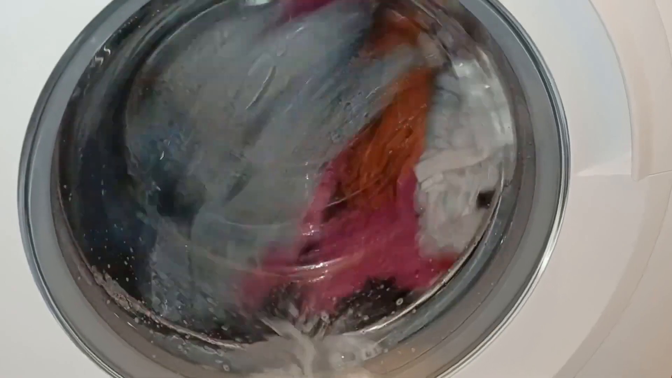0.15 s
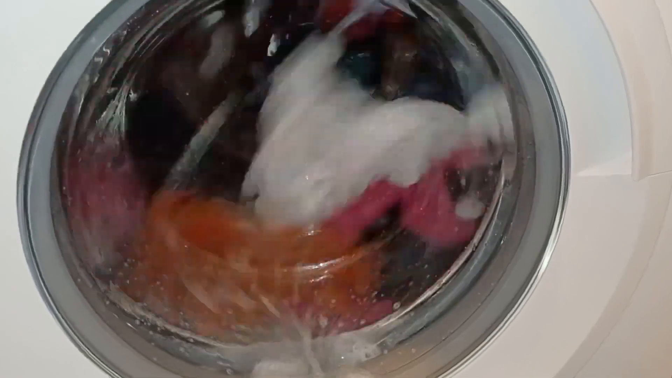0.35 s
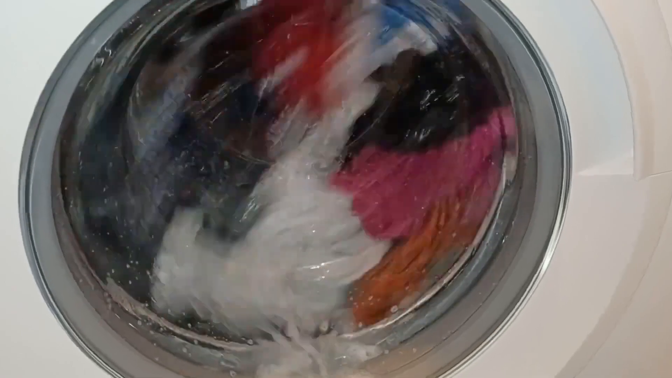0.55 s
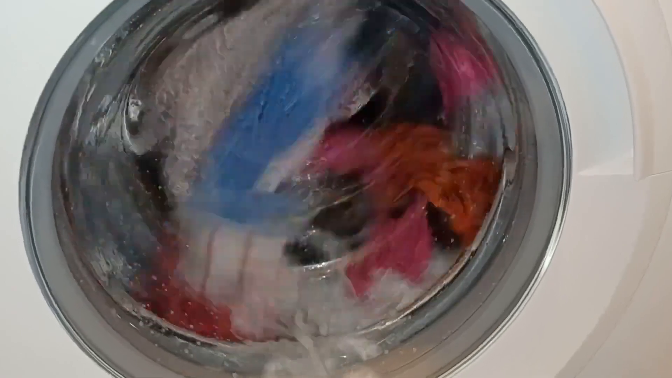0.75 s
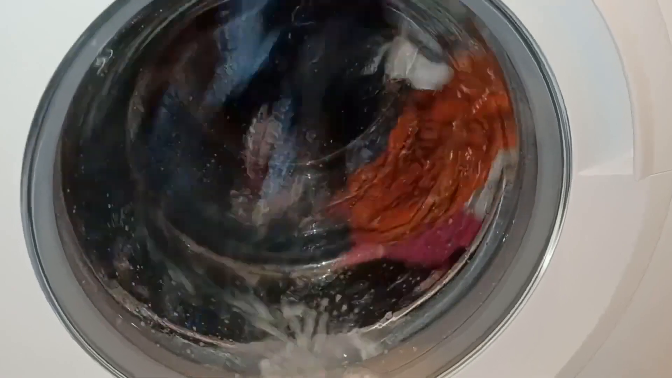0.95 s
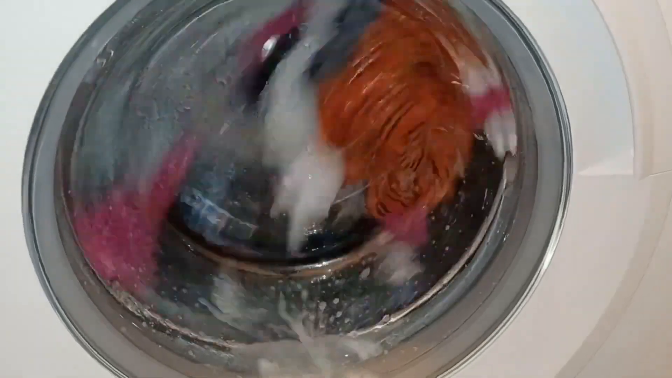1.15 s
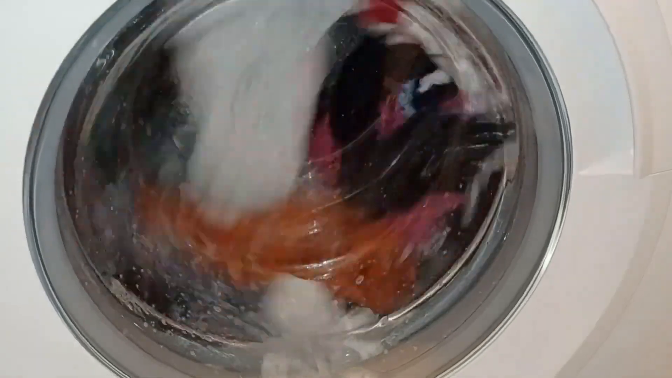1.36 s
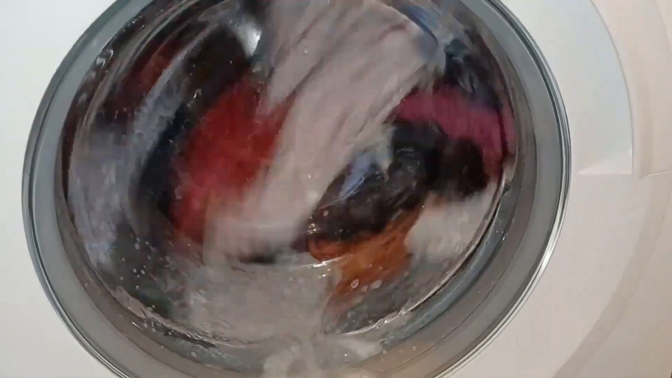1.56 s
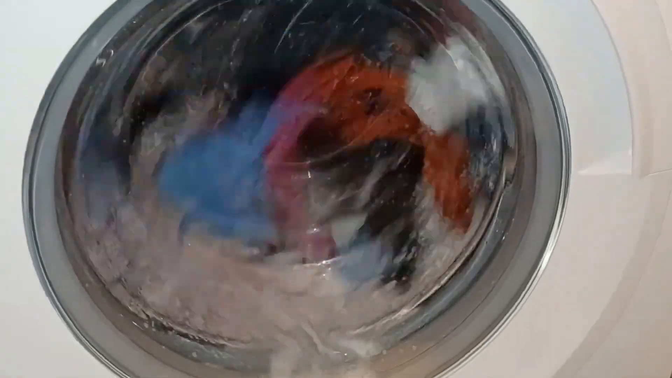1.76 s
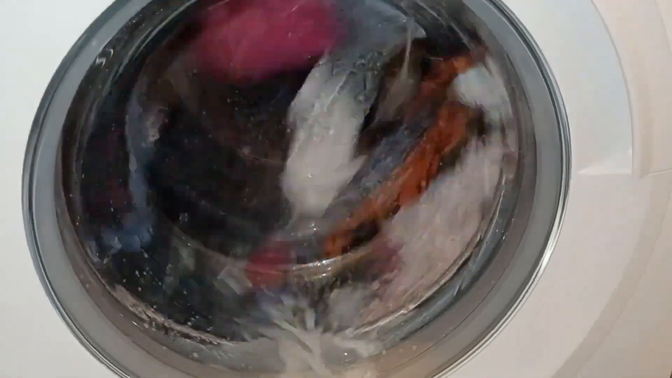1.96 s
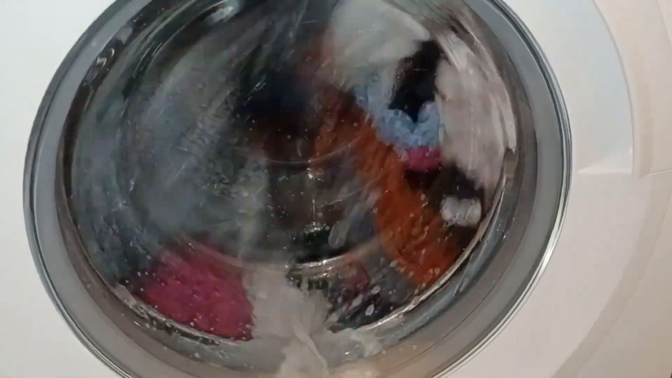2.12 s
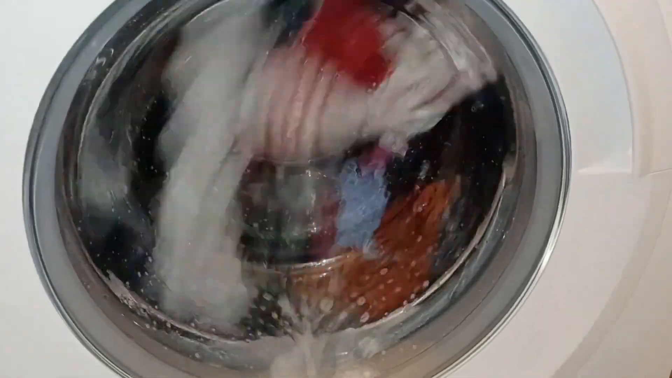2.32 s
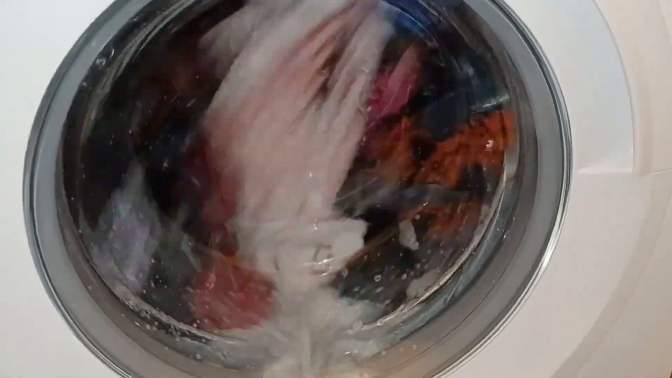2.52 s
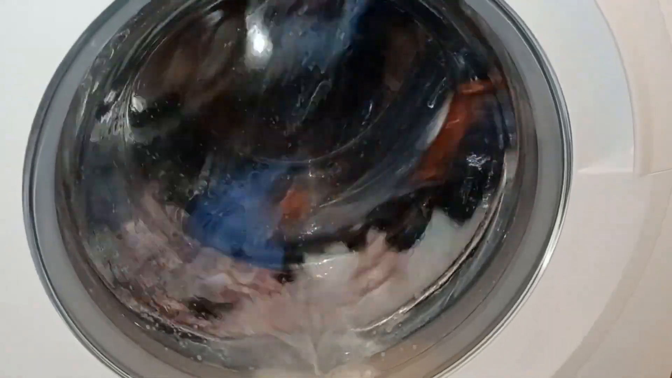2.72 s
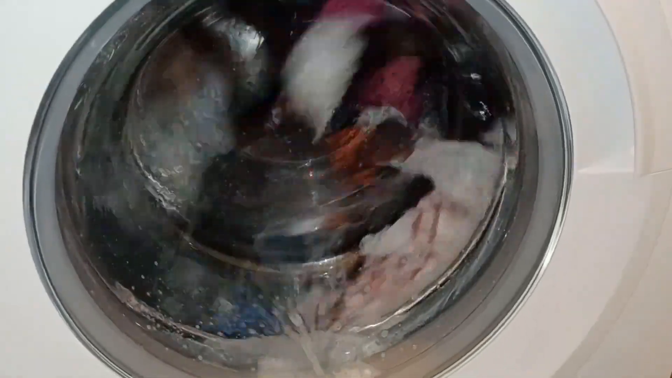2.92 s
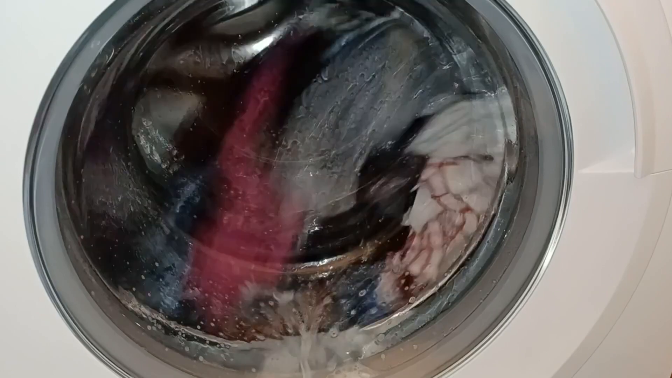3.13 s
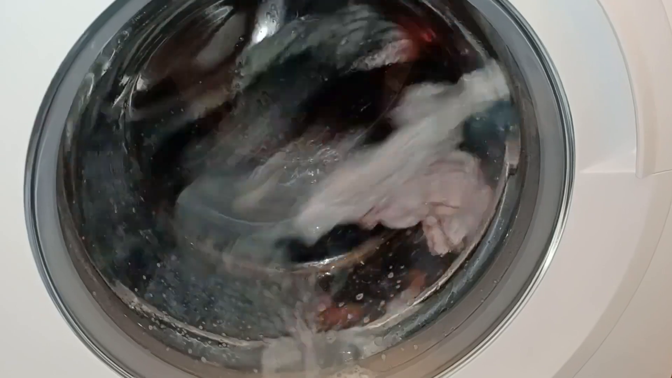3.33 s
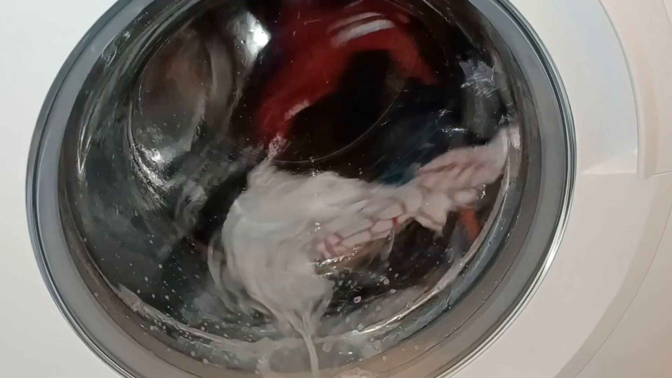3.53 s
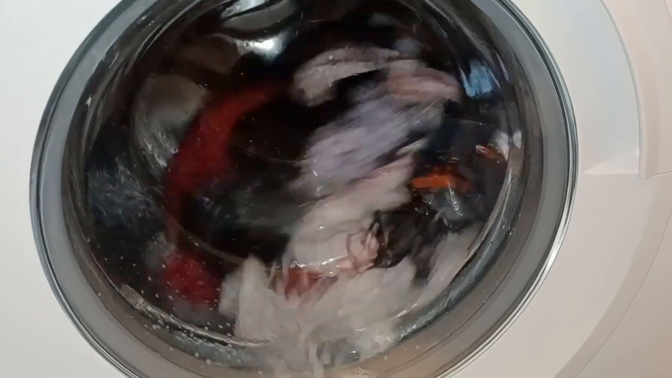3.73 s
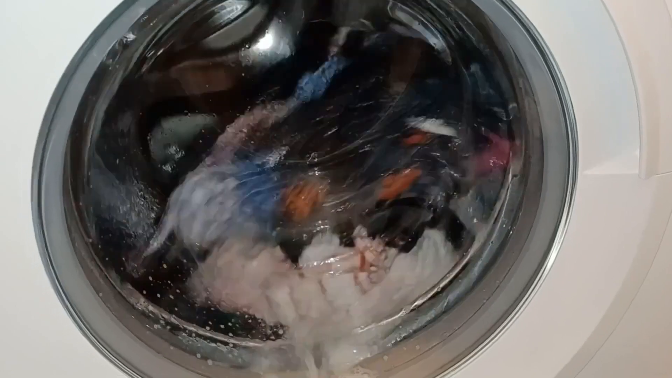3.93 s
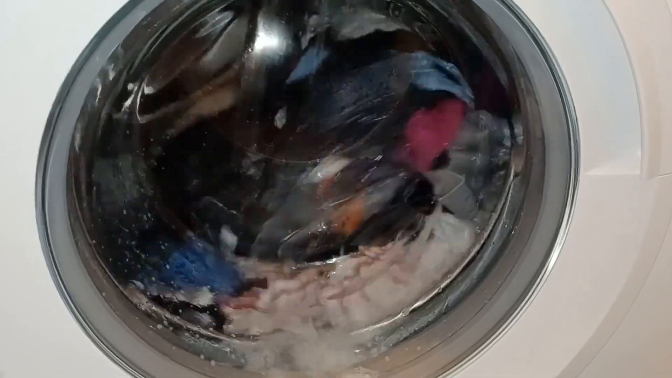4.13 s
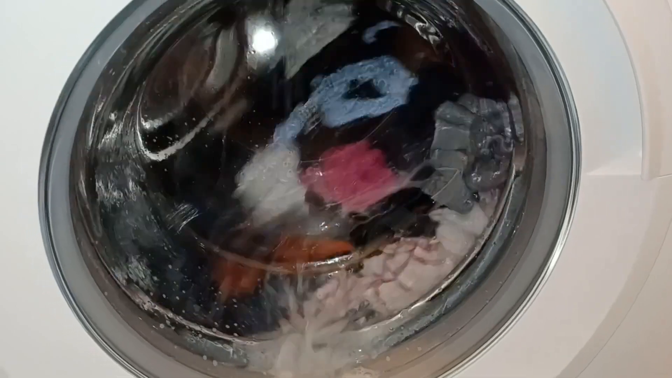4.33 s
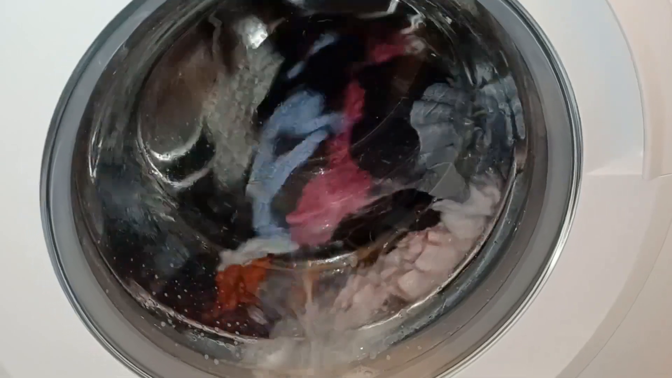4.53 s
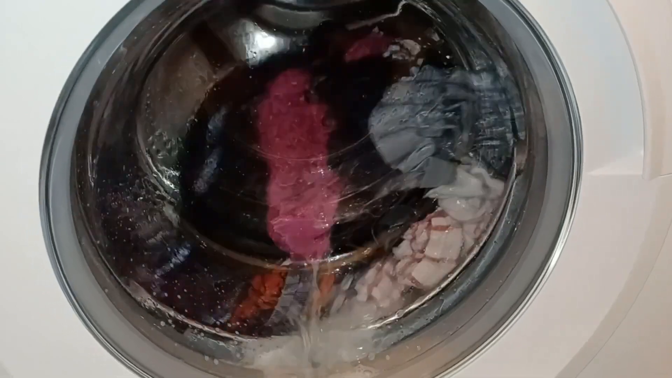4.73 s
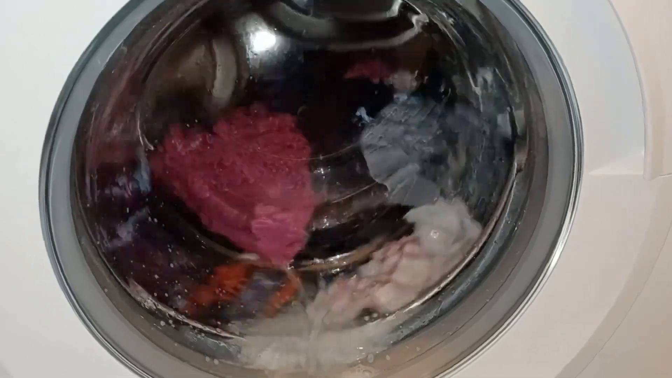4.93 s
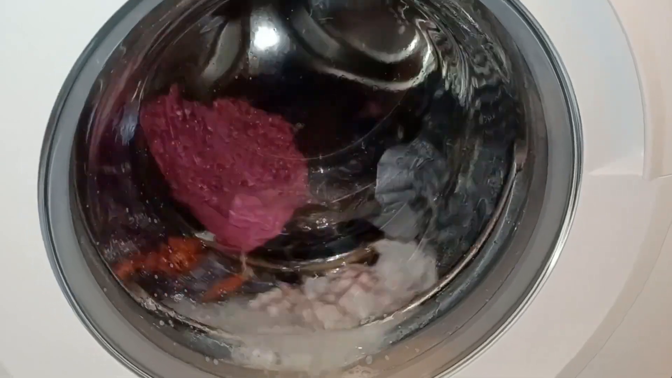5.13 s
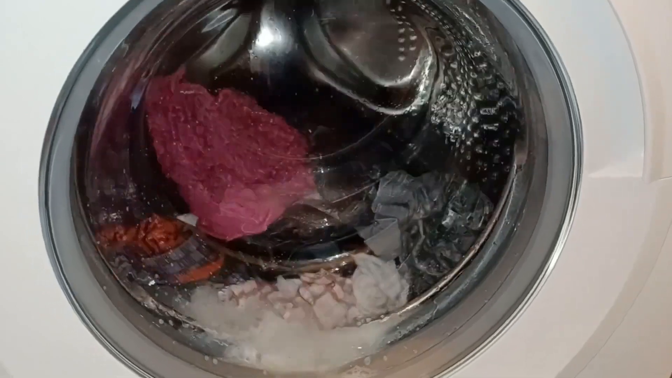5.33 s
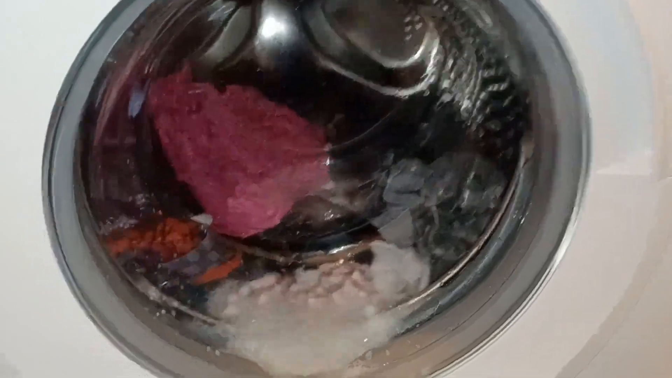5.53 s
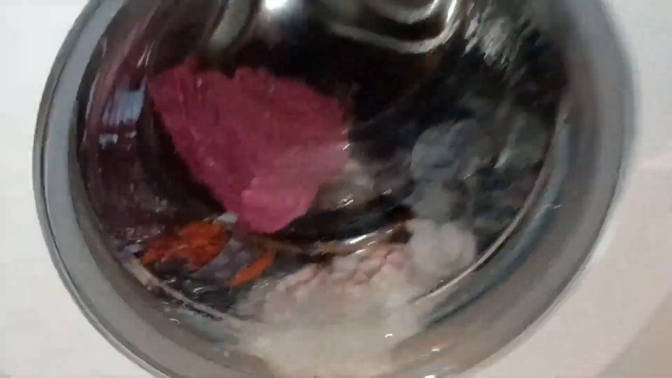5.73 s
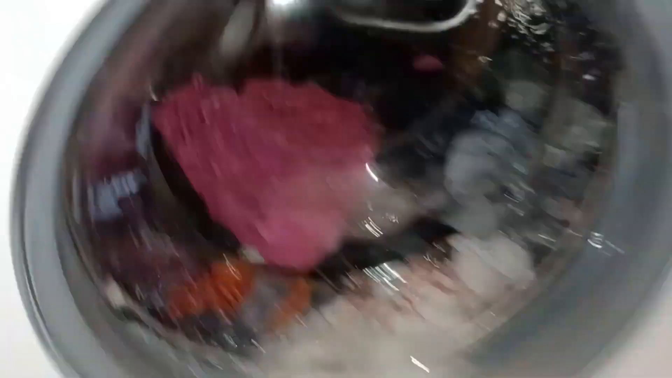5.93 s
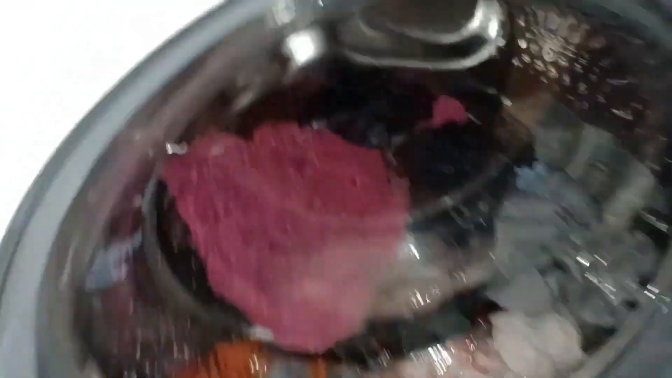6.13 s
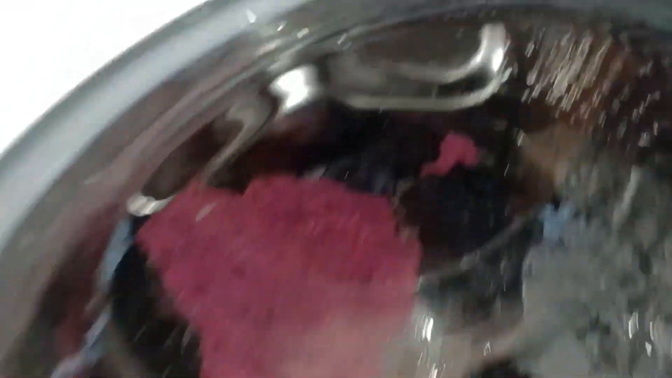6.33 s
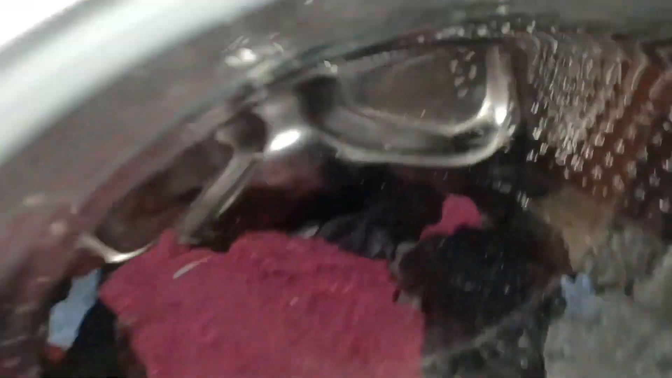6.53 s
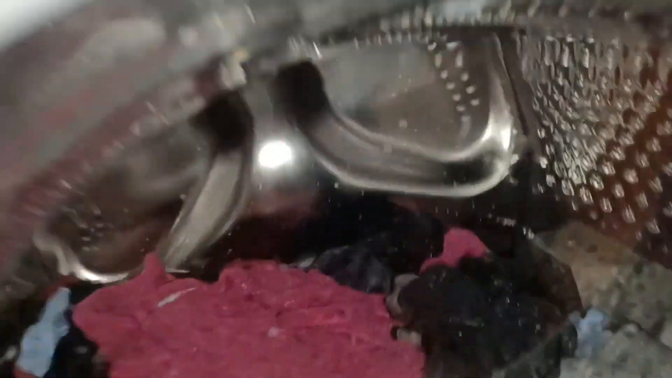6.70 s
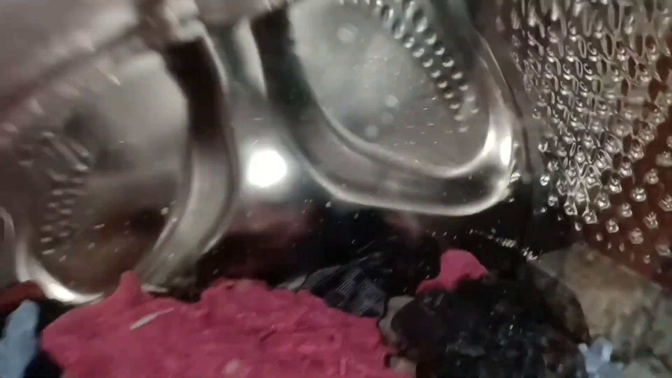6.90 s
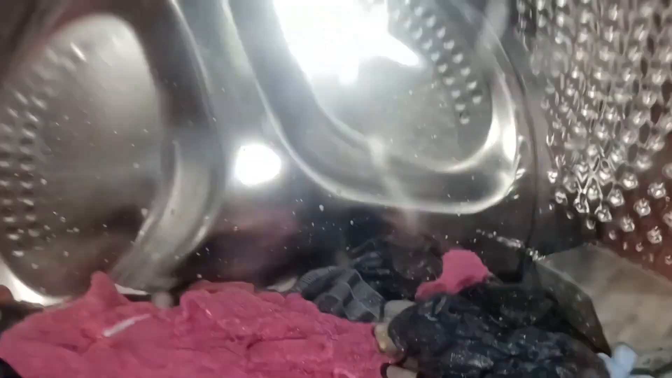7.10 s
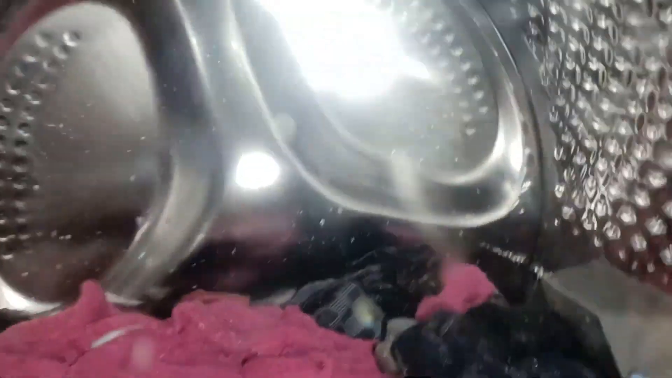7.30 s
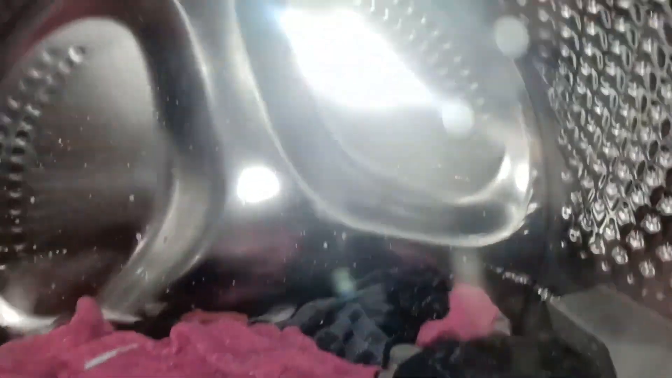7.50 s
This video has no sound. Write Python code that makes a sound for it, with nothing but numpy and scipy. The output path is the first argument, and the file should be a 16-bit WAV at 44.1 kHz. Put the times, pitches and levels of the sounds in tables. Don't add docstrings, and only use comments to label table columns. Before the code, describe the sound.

A handheld phone picks up a washer drum closely in stereo: quick irregular cloth thuds, a low swaying tub, splashing water and sharp hard ticks on the door. The load slows and stops by five seconds. A brief hush, then fingers bump and scrape the phone case with muffled knocks and papery hisses, fading into almost nothing.

```python
import sys
import numpy as np
from scipy import signal
from scipy.fft import rfft, irfft, next_fast_len
from scipy.io import wavfile
from scipy.ndimage import uniform_filter1d

SR = 44100
rng = np.random.default_rng(int(sys.argv[2]) if len(sys.argv) > 2 else 0)


def field_ratio(decibels):
    return 10 ** (np.asarray(decibels, dtype=float) / 20)


def log_audio(samples):
    frames = np.atleast_2d(samples).T
    limited = np.clip(frames, -1, 1)
    pcm = np.round(limited * 32767).astype(np.int16)
    wavfile.write(sys.argv[1], SR, pcm)


N = 337806
HZ = np.fft.rfftfreq(next_fast_len(N + SR // 2), 1 / SR)
TIME = np.arange(N) / SR


def evened(x):
    return x / np.sqrt(np.mean(abs(x) ** 2) + 1e-20)


def read(points, hz):
    f, value = np.transpose(points)
    return np.interp(np.log(hz + 1), np.log(f + 1), value)


def smooth(points):
    inside = (HZ > points[0][0]) * (HZ < points[-1][0])
    return evened(field_ratio(read(points, HZ)) * inside)


def ringing(modes, hz=HZ, luck_db=0):
    f, width, db = np.transpose(modes)[..., None]
    share = field_ratio(db + np.c_[luck_db])
    damping = 1j * hz * width
    return evened((share * damping / (f ** 2 - hz ** 2 + damping)).sum(0))


def roll_off(edge_hz, hz=HZ):
    return 1 / (1 + 1j * hz / edge_hz) ** 2


def through(x, response):
    return irfft(rfft(x, 2 * len(HZ) - 2) * evened(response))[..., :N]


def grainy(per_s, spread_db, decay_s):
    hit = rng.random(N) < per_s / SR
    size = field_ratio(spread_db * np.minimum(rng.exponential(1, N), 4)) * hit
    shower = signal.lfilter([1], [1, -np.exp(-1 / (decay_s * SR))], size ** 2)
    return evened(np.sqrt(shower + 1e-9) * rng.standard_normal((2, N)))


def swells(rows, rise_db_s, fade_db_s):
    s, hold, *columns = np.transpose(rows)[..., None]
    t = TIME[::64]
    shape_db = -rise_db_s * np.maximum(s - t, 0) - fade_db_s * np.maximum(t - s - hold, 0)
    return np.array([np.interp(TIME, t, np.sqrt((field_ratio(db + shape_db) ** 2).sum(0))) for db in columns])


def patchy(x, depth_db, size=(6, 12)):
    z = signal.stft(x, nperseg=512, noverlap=384)[2]
    field = uniform_filter1d(rng.standard_normal(z.shape[1:]), size=size[0], axis=0)
    gain = field_ratio(depth_db * evened(uniform_filter1d(field, size=size[1], axis=1)))
    return signal.istft(z * evened(gain), nperseg=512, noverlap=384)[1][:, :N]


def bumps(rows, ratio, rise_s, puff_hz, soft_t60_s, hard_db):
    out, t = np.zeros((2, N + 9000)), np.arange(9000) / SR
    band = signal.butter(2, [puff_hz / 3, puff_hz], "band", fs=SR)
    for s, db, hz, upper_db, puff_db in rows:
        t60_s = soft_t60_s / (1 + field_ratio(db - hard_db))
        fall = field_ratio(-60 * t / t60_s) * (1 - np.exp(-t / rise_s)) ** 2
        turn = 2 * np.pi * hz * (t + 0.0013 * (1 - np.exp(-t / 0.0091)))
        upper = field_ratio(upper_db - 94.0 * t / t60_s) * np.sin(ratio * turn)
        noise = signal.lfilter(*band, rng.standard_normal((2, len(t))))
        puff = field_ratio(puff_db - 20.6 * t / t60_s) * evened(noise)
        out[:, round(s * SR):][:, :len(t)] += field_ratio(db) * fall * (upper - np.sin(turn)) + puff
    return out[:, :N]


# frequency in Hz, level in dB per Hz.
ROOM = [(29, -44), (50, -5.5), (145, 3), (472, -13.5), (661, -10), (900, -16.5), (1150, -20.5),
        (2270, -26.5), (2810, -21.5), (3330, -33.5), (4350, -13.5), (7950, -14.5), (12300, -22.5),
        (16000, -31)]
ROOM_DB = -69.5
# centre in seconds, half width in seconds, depth in dB.
GATE_DIP = (5.52, 0.066, 5)


def room():
    s, width_s, db = GATE_DIP
    gate = field_ratio(ROOM_DB - db * np.exp(-((TIME - s) / width_s) ** 2))
    return gate * patchy(through(grainy(400, 1.5, 0.02), smooth(ROOM)), 2.5, size=(3, 40))


# time in seconds, level in dB.
CHURN = [(0, -45.5), (.46, -41), (.56, -47), (.68, -44.5), (2.0, -41.5), (2.12, -45.5), (2.2, -42.5),
         (2.7, -44), (2.95, -52), (3.7, -47), (4.1, -59), (4.4, -65.5), (4.7, -59.5), (5.0, -68),
         (5.15, -88), (5.35, -100)]


def churning():
    return field_ratio(np.interp(TIME, *np.transpose(CHURN), right=-140))


# frequency in Hz, width in Hz, level in dB.
TUB = [(41.8, 20, -18.5), (60.6, 7.2, -6), (76.8, 9.7, -4)]
# start in seconds, hold in seconds, level in dB.
SWAYS = [
    (0, 0.054, -54),
    (.26, 0.034, -30.5),
    (.78, 0.016, -46),
    (1.03, 0.025, -45.5),
    (1.52, 0.064, -35),
    (2.25, 0.11, -42),
    (2.5, 0.072, -40),
    (3.2, 0.15, -44.5),
    (4.82, 0.02, -50.5),
]
SWAY_RISE_DB_S, SWAY_FADE_DB_S, CHURN_TUB_DB = 102, 105.5, -10


def tub(churn):
    sway = np.hypot(swells(SWAYS, SWAY_RISE_DB_S, SWAY_FADE_DB_S)[0], churn * field_ratio(CHURN_TUB_DB))
    return through(sway * grainy(220, 0.71, 0.016), ringing(TUB) ** 2)


# arrival in seconds, hold in seconds, thump in dB, slosh in dB.
FALLS = [(0, 0.068, -35.5, -41.5), (.28, 0.045, -39, -43), (.37, 0.11, -41, -42), (.7, 0.053, -40.5, -39),
         (.87, 0.12, -40.5, -52.5), (.95, 0.019, -38.5, -40), (1.08, 0.13, -41.5, -42),
         (1.24, 0.11, -41, -49), (1.54, 0.066, -41, -37), (1.85, 0.051, -35.5, -41),
         (1.97, 0.076, -40, -41), (2.22, 0.062, -41.5, -41), (2.42, 0.012, -40.5, -63.5),
         (2.58, 0.092, -39, -43), (2.7, 0.027, -52, -39.5), (3.04, 0.11, -46, -48), (3.2, 0.051, -37, -42),
         (3.36, 0.025, -45.5, -44), (3.51, 0.15, -50, -49), (3.7, 0.056, -47, -60),
         (3.86, 0.04, -49.5, -49), (4.04, 0.048, -53.5, -50.5), (4.18, 0.022, -50, -59),
         (4.93, 0.026, -49.5, -62.5)]
FALL_RISE_DB_S, FALL_FADE_DB_S = 262.5, 183.5
# arrival in seconds, hold in seconds, thump in dB, slosh in dB.
SLAPS = [
    (0.672, 0.018, -43.5, -40),
    (1.534, .02, -51, -41),
    (1.372, 0.015, -33.5, -39),
    (4.477, 0.09, -52.5, -52.5),
    (4.772, 0.046, -50.5, -49.5),
    (4.818, 0.044, -40.5, -39.5),
]
SLAP_RISE_DB_S, SLAP_FADE_DB_S, CHURN_SLOSH_DB = 3006.5, 178, -3.5


def landings(churn):
    falls = swells(FALLS, FALL_RISE_DB_S, FALL_FADE_DB_S)
    slaps = swells(SLAPS, SLAP_RISE_DB_S, SLAP_FADE_DB_S)
    return np.hypot(np.hypot(falls, slaps), churn * field_ratio(np.c_[[0, CHURN_SLOSH_DB]]))


# frequency in Hz, width in Hz, level in dB.
CABINET = [(148, 39, 2), (221.2, 26, 2), (262.1, 11.2, 0.5), (325.5, 8.7, -13)]


def cabinet(thump):
    return field_ratio(1.0) * through(thump * grainy(150, 2.5, .015), ringing(CABINET) * roll_off(900))


# frequency in Hz, level in dB per Hz.
SLOSH = [(180, -18.5), (300, 4.5), (351, -8), (443, -8.5), (474, -18), (511, -27.5), (640, -4), (959, -5),
         (1800, -12), (2340, -55), (3960, -120)]
# frequency in Hz, width in Hz, level in dB.
DRUM = [(410, 7, -19), (535.7, 22, 5.5), (610, 180, 1.5), (795, 18, -1), (874, 27, 1), (1090, 50, -1.5)]


def sloshing(slosh):
    drum = evened(ringing(DRUM) * roll_off(2000))
    return field_ratio(1.5) * through(slosh * grainy(400, 2.5, .01), smooth(SLOSH) + field_ratio(-5) * drum)


# frequency in Hz, width in Hz, level in dB.
GLASS = [(1614, 25, -2), (1743, 70, 3.5), (2010, 58, 10), (2492, 98, 4.5), (3600, 120, -17), (3873, 180, 1),
         (4174, 700, -8.5), (4523, 400, -2.5), (5014, 100, -2.5), (6240, 630, -3.5), (6836, 480, 13)]
DRIPS, DRIP_SPREAD_DB, DRIP_END_S = 2200, 3, 5.2
DRIP_RISE_S, DRIP_T60_S, DRIP_DETUNE = .0015, .035, .03


def drips():
    when, pick, size, bend, lag = rng.random((DRIPS, 5)).T[..., None]
    mode = (pick * (len(GLASS) - 2)).astype(int)
    hz, _, db = np.moveaxis(np.array(GLASS)[mode], -1, 0)
    step = np.arange(560)
    t = step / SR
    level_db = db / 2 - DRIP_SPREAD_DB * np.log(size + .03)
    shape = field_ratio(level_db - 60 * t / DRIP_T60_S) * (1 - np.exp(-t / DRIP_RISE_S))
    turn = 2 * np.pi * hz * (1 + DRIP_DETUNE * (2 * bend - 1)) * t
    at = ((when * DRIP_END_S * SR).astype(int) + step).ravel()
    ports = [shape * np.sin(turn + k * np.pi * lag) for k in (0, 1)]
    return evened(np.array([np.bincount(at, p.ravel(), N + len(t))[:N] for p in ports]))


# frequency in Hz, level in dB per Hz.
SPRAY = [(710, -23.5), (1200, 1.5), (2020, -3), (2210, -1), (2560, 1.5), (3100, -7), (4560, -6),
         (5900, -11.5), (6980, -32.5), (8200, -53), (10700, -64), (18000, -120)]
# frequency in Hz, level in dB per Hz.
FIZZ = [(4710, -13), (8000, 5.5), (8310, -19), (8850, 7.5), (11200, 2), (13400, -2.5), (14200, -18),
        (15100, -6), (16000, -7)]
# arrival in seconds, hold in seconds, spray in dB, fizz in dB.
SPLASHES = [(0, 0.0026, -42, -58), (.06, 0.34, -52.5, -69.5), (.26, 0.015, -40.5, -62),
            (.34, 0.032, -43.5, -64.5), (.43, 0.0061, -43, -61.5), (.6, 0.055, -58, -98),
            (.67, 0.059, -46.5, -65.5), (.8, 0.17, -50, -67), (1.03, 0.28, -53.5, -74),
            (1.33, 0.018, -47, -63.5), (1.44, 0.1, -48.5, -59.5), (1.61, 0.058, -43, -61),
            (1.74, 0.052, -46.5, -66), (1.85, 0.16, -51.5, -71), (2.16, 0.19, -55, -72),
            (2.38, 0.088, -48.5, -62), (2.6, 0.01, -42, -57.5), (2.68, 0.066, -54.5, -71),
            (3.03, 0.032, -57, -80), (3.11, 0.067, -50, -70), (3.21, 0.03, -46.5, -67),
            (3.3, 0.11, -50.5, -75.5), (3.51, 0.11, -57, -81), (3.68, 0.068, -63.5, -81),
            (3.81, 0.1, -57, -78), (4.008, 0.088, -58, -81.5), (4.22, 0.041, -65.5, -77.5),
            (4.385, 0.078, -72, -81.5), (4.485, 0.025, -63, -88.5), (4.78, 0.017, -55.5, -84.5),
            (4.825, 0.043, -50.5, -75.5)]
SPLASH_RISE_DB_S, SPLASH_FADE_DB_S = 748, 178
CHURN_SPRAY_DB, CHURN_FIZZ_DB = -11, -33
SPRAY_STEEP, FULL_CHURN_DB = 0.32, -43.5
DRIP_DB = -6.5


def spraying(churn):
    thinning = (churn / field_ratio(FULL_CHURN_DB)) ** SPRAY_STEEP
    steady = churn * thinning * field_ratio(np.c_[[CHURN_SPRAY_DB, CHURN_FIZZ_DB]])
    spray, fizz = np.hypot(swells(SPLASHES, SPLASH_RISE_DB_S, SPLASH_FADE_DB_S), steady)
    drops = grainy(700, 2.5, .006)
    patter = through(spray * drops, smooth(SPRAY) + field_ratio(-11) * ringing(GLASS))
    pings = spray * drips()
    return field_ratio(DRIP_DB) * pings + field_ratio(2.5) * patter + field_ratio(10.5) * through(fizz * drops, smooth(FIZZ))


def tumble():
    churn = churning()
    thump, slosh = landings(churn)
    wet = sloshing(slosh) + spraying(churn)
    return tub(churn) + cabinet(thump) + patchy(wet, 1.72)


# start in seconds, peak in dB, pitch in Hz.
TAPS = [(0.051, -42, 2020), (0.176, -29, 2510), (0.223, -34.5, 2550), (0.2414, -36, 2000),
        (0.3142, -38, 1940), (0.348, -21, 1520), (0.415, -34, 1490), (0.5867, -49, 1480),
        (0.8054, -29, 2500), (0.9408, -37.5, 2100), (1.0665, -42, 1580), (1.174, -37, 2640),
        (1.287, -28, 1430), (1.3572, -26, 2440), (1.433, -30, 2600), (1.6766, -26, 2090),
        (1.782, -40, 4930), (1.9164, -47, 1950), (2.0374, -52, 1510), (2.155, -36, 1540),
        (2.4399, -33, 1970), (2.5277, -36, 2560), (2.59, -30.5, 2580), (2.7013, -43, 1650),
        (3.1504, -36.5, 3940), (3.21, -30.5, 1700), (3.302, -40, 3770), (3.3157, -36, 2580),
        (3.415, -49.5, 2590), (3.506, -43, 1780), (3.5496, -37, 4030), (3.7144, -48, 1760),
        (3.915, -44, 3600)]
TAP_DB, TAP_OVERTONE, TAP_LAG_S = -5, 1.6, 0.00043
TAP_T60_S, TAP_CRACK_DB = .022, -10


def taps():
    out, t = np.zeros((2, N)), np.arange(2048) / SR
    luck = rng.uniform(-0.82, 1, (len(TAPS), 2))
    for (s, db, hz), (lag, bend) in zip(TAPS, luck):
        late = np.maximum(t - TAP_LAG_S * np.c_[[1, 1 + lag]], 0)
        overtone_hz = hz * TAP_OVERTONE * (1 + 0.19 * bend)
        ring = np.sin(2 * np.pi * hz * late) + 0.73 * np.sin(2 * np.pi * overtone_hz * late)
        noise = uniform_filter1d(rng.standard_normal((2, len(t))), size=6, axis=1)
        crack = field_ratio(TAP_CRACK_DB - 90 * t / TAP_T60_S) * noise
        tick = field_ratio(-60 * late / TAP_T60_S) * ring + crack
        out[:, round(s * SR):][:, :len(t)] += field_ratio(db + TAP_DB) * tick
    return out


# start in seconds, low
# glass modes in dB, high glass modes in dB, fizz in dB.
CLACKS = [(0.063, -27, -66, -55), (0.2594, -54, -55, -77.5), (0.345, -29.5, -36, -70.5),
          (0.3681, -30.5, -42, -64.5), (0.431, -28.5, -42, -67), (0.677, -42, -57, -65),
          (0.782, -52, -46, -40), (0.867, -34, -46, -67.5), (0.9373, -32, -39.5, -37),
          (1.254, -46, -49.5, -37.5), (1.347, -47, -46, -62), (1.471, -24, -39, -30),
          (1.611, -16, -21, -45), (1.666, -36.5, -54.5, -48.5), (1.7492, -34.5, -40, -32.5),
          (1.7827, -30, -37.5, -58.5), (1.95, -34.5, -41, -36), (2.34, -34, -42, -34.5),
          (2.429, -38, -39, -32), (2.465, -48, -40.5, -62), (2.601, -41, -37, -37),
          (2.621, -49, -40.5, -62),
          (1.534, -45, -60.5, -62.5),
    (3.217, -56, -41, -64),
    (3.294, -33, -40.5, -63),
    (3.329, -32, -42.5, -70),
    (3.396, -53, -49, -76),
    (4.006, -44, -73, -82),
    (4.413, -85, -65.5, -67.5),
    (4.44, -85, -66, -68),
    (4.816, -47, -50.5, -71),
]
# start in seconds, peak in dB.
BURSTS = [(0.176, -44.5), (0.2404, -46), (0.3586, -47), (0.4309, -44), (0.7178, -43), (0.7826, -43.5),
          (0.9363, -47.5), (1.254, -48.5), (1.3334, -44.5), (1.4282, -49), (1.4706, -37), (1.6107, -37),
          (1.7394, -45.5), (1.949, -48), (2.3391, -51), (2.383, -45), (2.4304, -35.5), (2.601, -42.5),
          (3.2016, -51), (3.2954, -55)]
BURST_DB, BURST_GLASS_DB = 3, -9.5
LIGHT_CONTACT_S, SHARP_DB = 0.0055, -21.5


def clacks():
    out, t, hz = np.zeros((2, N)), np.arange(4096) / SR, np.fft.rfftfreq(4096, 1 / SR)
    fizz = evened(field_ratio(read(FIZZ, hz)) * (hz > 7500)) + field_ratio(5.5) * ringing(GLASS[-1:], hz)
    bursts = [(s, db + BURST_GLASS_DB, db + BURST_GLASS_DB, db + BURST_DB) for s, db in BURSTS]
    rows = CLACKS + bursts
    luck_db = 3 * rng.standard_normal((len(rows), len(GLASS)))
    for (s, low_db, high_db, fizz_db), spot_db in zip(rows, luck_db):
        contact_s = LIGHT_CONTACT_S / (1 + field_ratio(max(low_db, high_db) - SHARP_DB))
        shape = (1 - np.exp(-t / .0008)) * np.exp(-t / max(contact_s, .002))
        low = field_ratio(low_db + 2.0) * ringing(GLASS[:4], hz, spot_db[:4]) * roll_off(5000., hz)
        high = field_ratio(high_db + 10.5) * ringing(GLASS[4:-1], hz, spot_db[4:-1]) * roll_off(9000., hz)
        rattle = rfft(shape * rng.standard_normal((2, len(t))))
        at = round(s * SR)
        out[:, at:at + len(t)] += irfft(rattle * (low + high + field_ratio(fizz_db - 5.0) * fizz))
    return out


# start in seconds, peak in dB, pitch in Hz, opposed faster-dying part # at the
# same pitch in dB, slap in dB.
THUDS = [(0.285, -17.5, 193, -5, -42), (0.469, 1, 244, 8, -33), (0.688, -43.5, 260, 17, -36.5),
         (0.732, -21, 260, -10, -50), (0.869, -24, 194, 11.5, -44), (1.371, -8, 210, -13, -36),
         (1.385, -16.5, 256, 1, -49.5), (1.398, -24.5, 427, -13, -53), (1.572, -15.5, 260, -7, -53),
         (1.535, -37.5, 261, -19, -35), (1.848, -22, 256, -4, -55), (2.237, -21, 245, 10, -40),
         (2.627, -29, 235, -12, -35.5), (2.745, -15.5, 262, -10, -37), (3.238, -37, 246, 2, -43.5),
         (3.502, -45.5, 234, 13, -40), (4.476, -51, 276, -11, -58), (4.816, -48.5, 237, -2.5, -47)]


def thuds():
    return field_ratio(-3.0) * bumps(THUDS, 1.0, 0.005, 1310.0, soft_t60_s=0.13, hard_db=-16)


# frequency in Hz, width in Hz, level in dB.
CASE = [(71, 66, 6), (118, 53, 5), (204, 37, -1), (300, 850, 3.5)]
# frequency in Hz, level in dB per Hz.
SCRAPE = [(250, 16.5), (450, 5), (650, -3), (900, 4), (1030, -31), (1200, -41.5)]
RUB = [(2300, -36), (3140, -21.5), (4520, -5.5), (5500, -8), (6990, -6.5), (7790, -17.5), (8500, -15),
       (11000, -57)]
RASP = [(900, -6.5), (1600, -7.5), (1990, -6.5), (2620, -3.5), (3140, -10.5), (4200, -20)]
FINE = [(4880, -44), (8300, -1.5), (12100, -3.5), (14000, -13), (15800, -16)]
# start in seconds, hold in seconds, low case mode in dB,
# upper case modes in dB, scrape in dB.
GRIP = [(5.37, 0.042, -89, -67, -87), (5.48, 0.028, -78, -60.5, -72), (5.68, 0.043, -65.5, -65, -73.5),
        (5.76, 0.13, -73.5, -69.5, -75.5), (5.86, .02, -66, -52.5, -66), (5.895, 0.043, -65, -45.5, -65),
        (5.945, 0.03, -26, -33, -46.5), (5.97, 0.17, -43.5, -46.5, -58), (6.185, 0.023, -45.5, -43, -74.5),
        (6.235, 0.074, -37, -43, -73), (6.36, 0.12, -32, -41.5, -55.5), (6.5, 0.041, -40, -40, -51.5),
        (6.562, 0.032, -41.5, -37.5, -52), (6.63, 0.12, -57.5, -51, -64), (6.742, 0.081, -35, -38, -65),
        (6.765, 0.075, -45, -48, -48.5), (6.87, 0.058, -45, -51.5, -64), (6.97, 0.022, -47.5, -53, -66),
        (7.01, 0.05, -64, -62, -67), (7.123, 0.1, -41, -47.5, -54), (7.29, 0.03, -55, -65.5, -88.5),
        (7.58, 0.026, -62, -70.5, -78.5), (7.63, .04, -73, -66, -60)]
GRIP_RISE_DB_S, GRIP_FADE_DB_S = 1498.5, 329
# start in seconds, hold in seconds, hiss in dB, rasp in dB.
STROKES = [(5.05, 0.21, -86.5, -105), (5.625, .02, -78.5, -82.5), (5.68, 0.087, -69, -82),
           (5.82, 0.036, -61.5, -70), (5.96, 0.014, -51, -51.5), (6.05, 0.11, -52.5, -63),
           (6.27, 0.13, -49, -54.5), (6.45, 0.091, -80, -56.5), (6.58, 0.013, -60.5, -94),
           (6.77, 0.053, -58, -63), (6.98, 0.027, -64, -71.5), (7.14, 0.035, -64, -74),
           (7.38, 0.22, -70.5, -86), (7.64, .03, -83, -76)]
STROKE_RISE_DB_S, STROKE_FADE_DB_S = 168.5, 104.5
# start in seconds, hold in seconds, dull part in dB, thin part in dB.
TICKS = [(5.9335, 0.0024, -41.5, -42), (6.256, 0.0029, -52, -56), (6.31, 0.0032, -54, -50.5),
         (6.4106, 0.0069, -56.5, -77), (6.476, 0.0046, -54.5, -78), (6.561, 0.003, -59, -81),
         (6.696, .003, -75.5, -80.5), (6.739, 0.0036, -68, -76), (6.78, 0.0031, -53.5, -73),
         (6.85, .002, -70, -59.5), (7.101, .001, -90.5, -58), (7.122, 0.003, -62, -59),
         (7.372, 0.0031, -75, -85)]
TICK_RISE_DB_S, TICK_FADE_DB_S = 15005, 2009
FINE_DB = -1.5


def hand():
    deep, upper, scrape = swells(GRIP, GRIP_RISE_DB_S, GRIP_FADE_DB_S)
    hiss, rasp = swells(STROKES, STROKE_RISE_DB_S, STROKE_FADE_DB_S)
    dull, thin = swells(TICKS, TICK_RISE_DB_S, TICK_FADE_DB_S)
    grip = grainy(700, 1.1, .008)
    skin = grainy(810, 0.46, 0.011)
    rumble = through(deep * grip, ringing(CASE[:2]) ** 2)
    rumble = rumble + through(upper * grip, ringing(CASE[2:]) ** 2 * roll_off(454) ** 2)
    low = field_ratio(2.0) * rumble + through(scrape * grip, smooth(SCRAPE))
    rub = through((hiss + dull) * skin, smooth(RUB))
    rough = through((rasp + field_ratio(-3.0) * dull) * skin, smooth(RASP))
    fine = through((field_ratio(FINE_DB) * hiss + thin) * skin, smooth(FINE))
    return low + rub + rough + fine


# start in seconds, peak in dB, pitch in Hz, upper mode in dB, puff in dB.
KNOCKS = [(5.468, -46.5, 148, -2, -68.5), (5.931, -2.5, 123, -5, -42.5), (5.9435, -15, 111, -5, -37),
          (6.229, -26, 136, 4, -52), (6.266, -24, 102.6, 6, -43.5), (6.316, -12.5, 111.4, -14, -46),
          (6.368, -15, 122.5, -7, -47.5), (6.4725, -13, 125.2, 3.5, -43), (6.559, -19.5, 139.6, 4, -40.5),
          (6.745, -27, 156.7, -6, -52), (6.778, -29.5, 129.8, 3.5, -45), (6.808, -47.5, 142, -15, -65),
          (6.967, -30.5, 127.3, -5, -80), (7.286, -43.5, 137, -9, -77.5),
          (7.121, -26.5, 136.6, -1.5, -55.5)]


def knocks():
    return field_ratio(-3.5) * bumps(KNOCKS, 1.82, 0.0023, 780.0, soft_t60_s=0.14, hard_db=1)


def scene():
    return room() + tumble() + taps() + clacks() + thuds() + hand() + knocks()


def low_pass(x):
    return signal.sosfilt(signal.butter(12, 16460, fs=SR, output="sos"), x)


# frequency in Hz, left-right likeness (1 = same).
SAME = [(60, 0.77), (130, 1), (290, 0.69), (640, 0.51), (1410, -1.1), (3100, 0.13), (6820, -1.3),
        (15000, 0.15)]
# frequency in Hz, left minus right in dB.
LEAN = [(40, 0), (80, -3.5), (180, -2), (350, -.8), (1400, -.8), (2800, -5.5), (5000, -9), (9000, -8),
        (14000, -4)]
# centre in Hz, half width in Hz, depth in dB.
NOTCH = (8110, 2300, 14.9)
EDGE_HZ, BASS_CUT_HZ = 15850, 48


def record(dry):
    a, b = rfft(dry, 2 * len(HZ) - 2)
    same = np.clip(read(SAME, HZ), 0, 1)
    lean = field_ratio(read(LEAN, HZ) / 2)
    ports = np.array([a * lean, (same * a + np.sqrt(1 - same ** 2) * b) / lean])
    bass_cut = (HZ / (HZ - 1j * BASS_CUT_HZ)) ** 5
    hz, width_hz, db = NOTCH
    dip = field_ratio(-db * np.exp(-((HZ - hz) / width_hz) ** 2)) * (HZ < EDGE_HZ)
    return low_pass(irfft(ports * bass_cut * dip)[:, :N])


dry = scene()
out = record(dry)
log_audio(out)
```